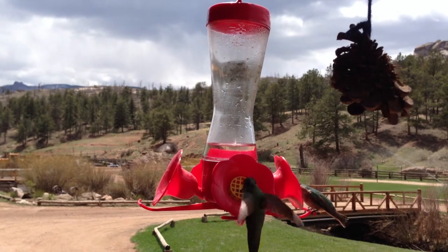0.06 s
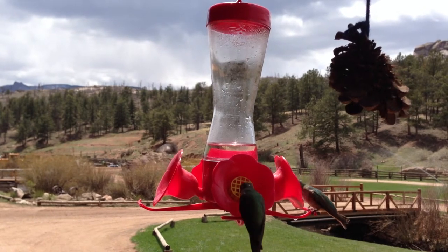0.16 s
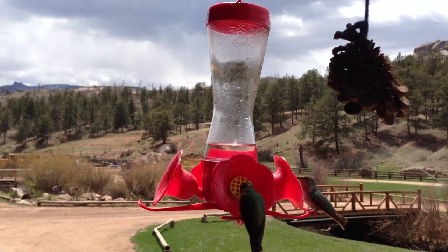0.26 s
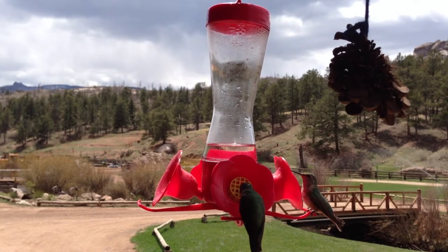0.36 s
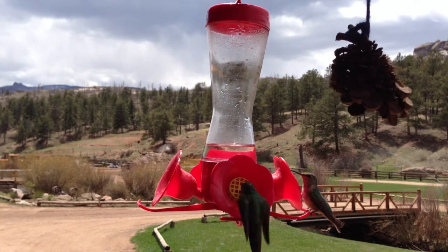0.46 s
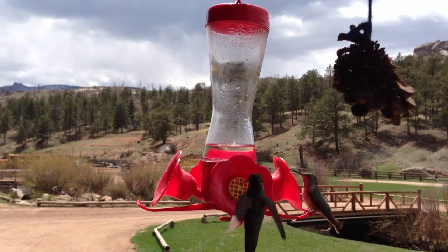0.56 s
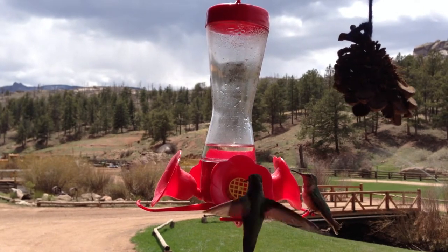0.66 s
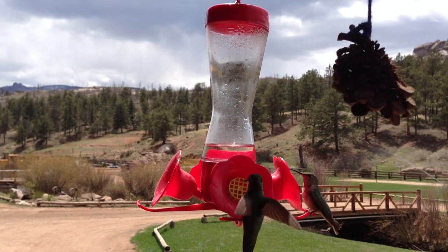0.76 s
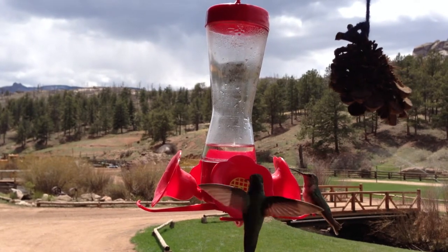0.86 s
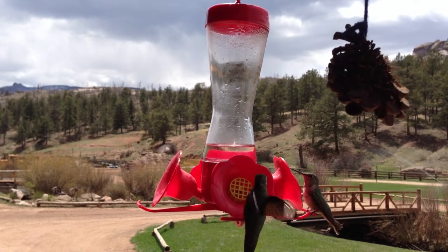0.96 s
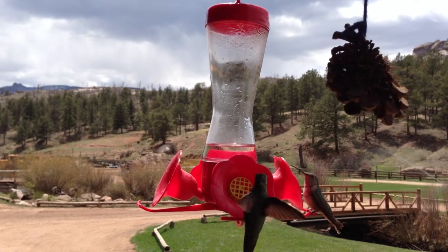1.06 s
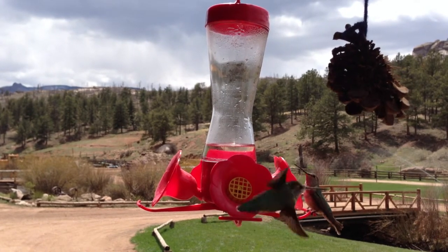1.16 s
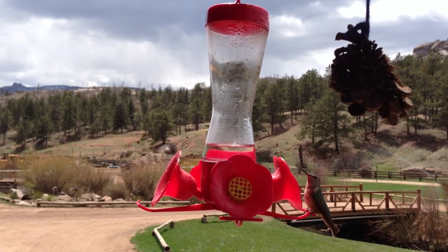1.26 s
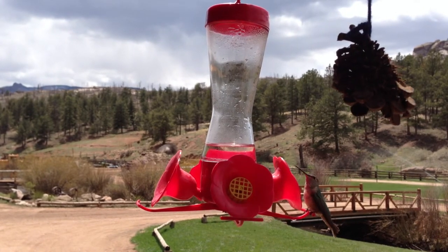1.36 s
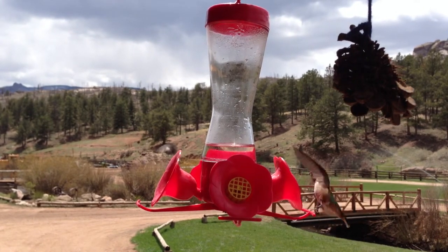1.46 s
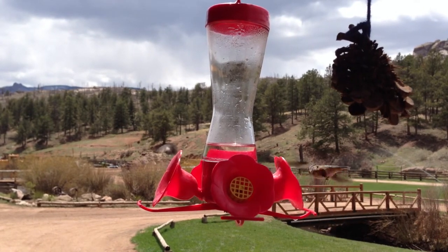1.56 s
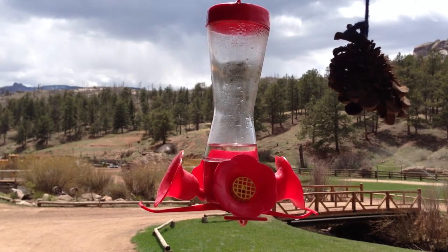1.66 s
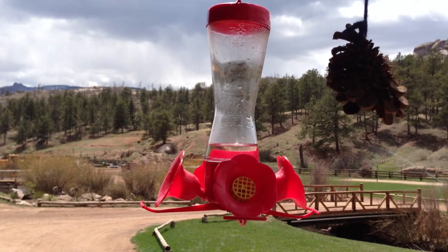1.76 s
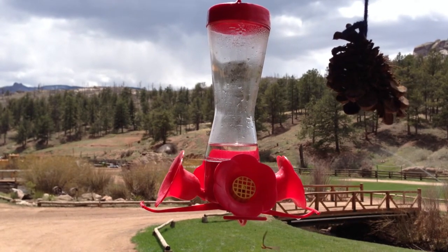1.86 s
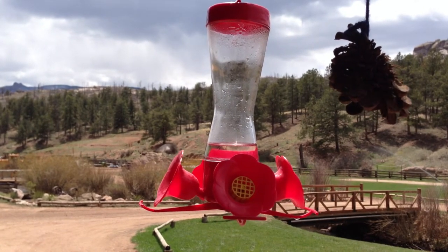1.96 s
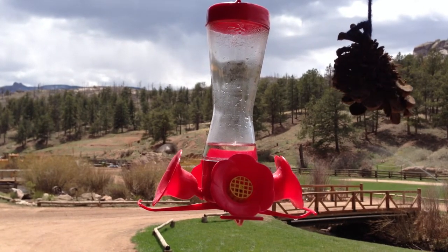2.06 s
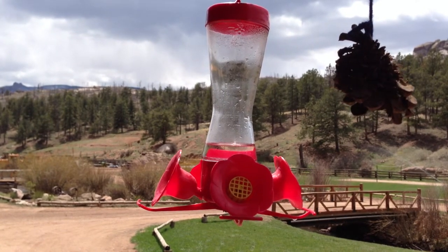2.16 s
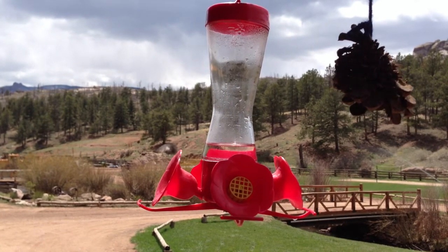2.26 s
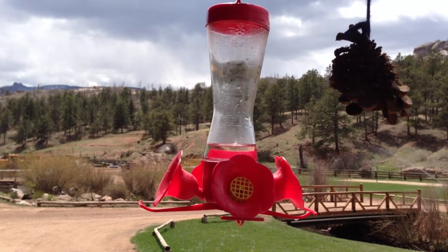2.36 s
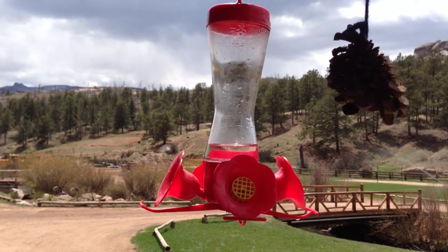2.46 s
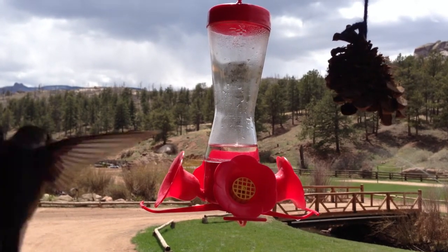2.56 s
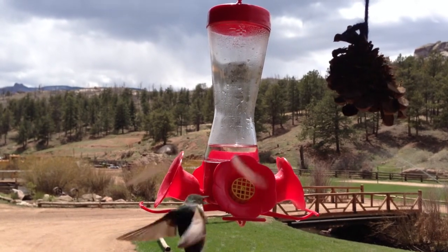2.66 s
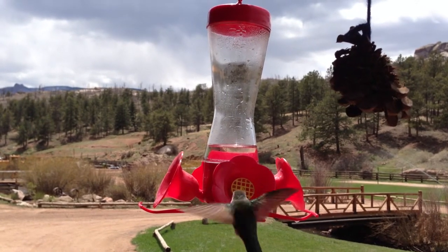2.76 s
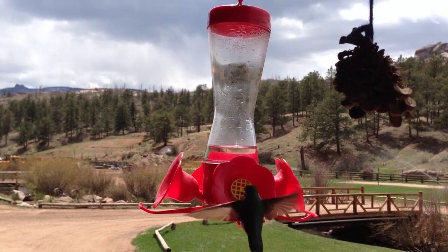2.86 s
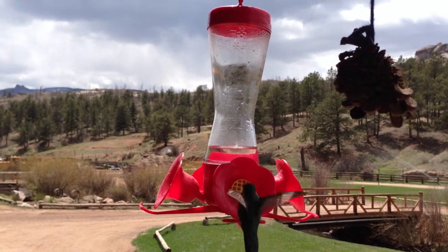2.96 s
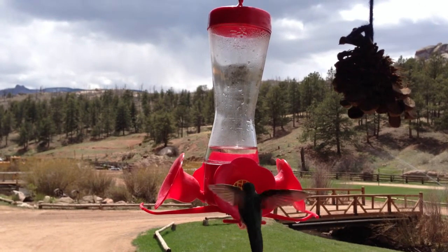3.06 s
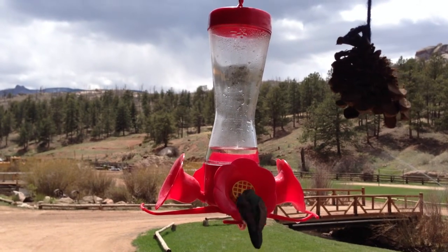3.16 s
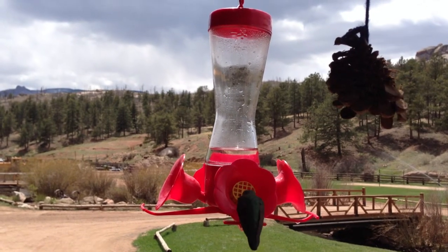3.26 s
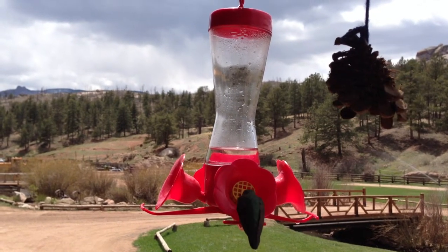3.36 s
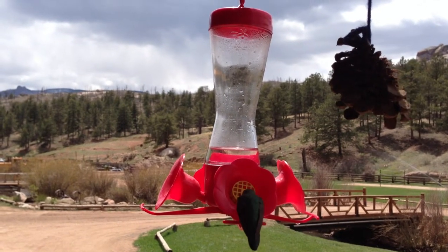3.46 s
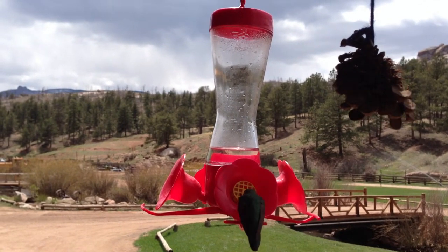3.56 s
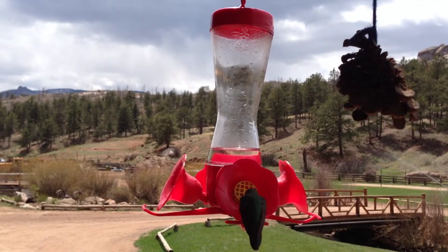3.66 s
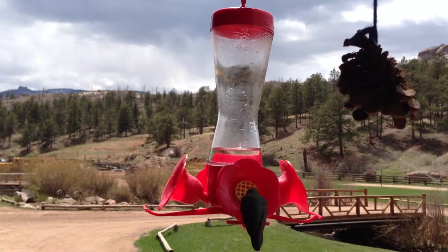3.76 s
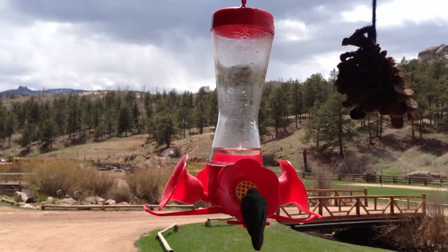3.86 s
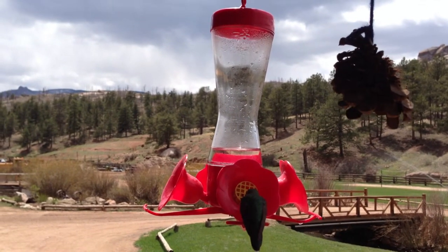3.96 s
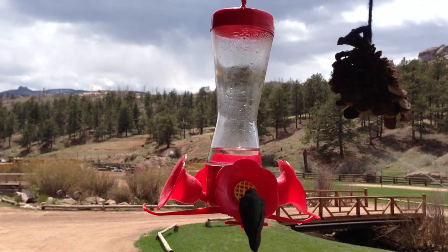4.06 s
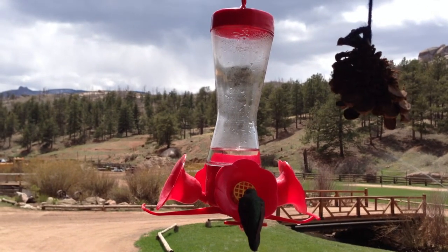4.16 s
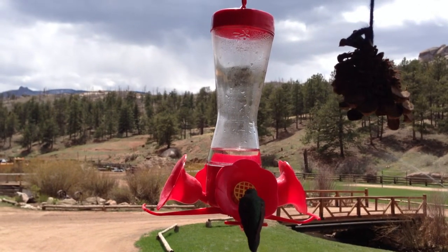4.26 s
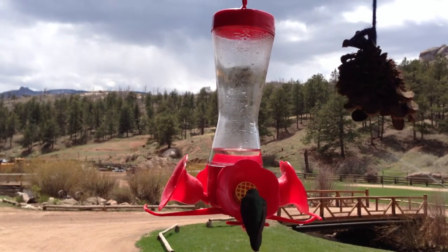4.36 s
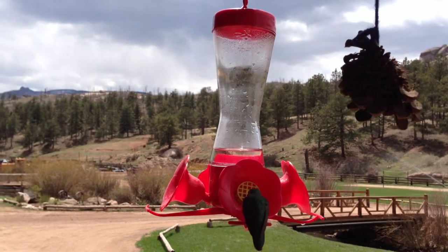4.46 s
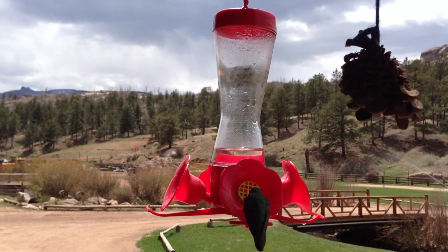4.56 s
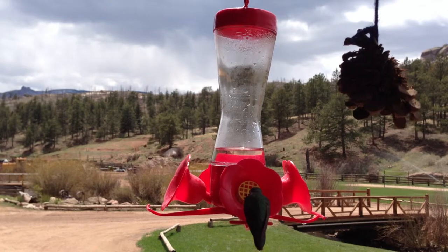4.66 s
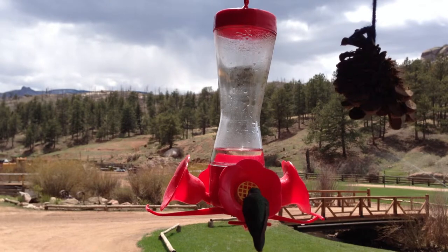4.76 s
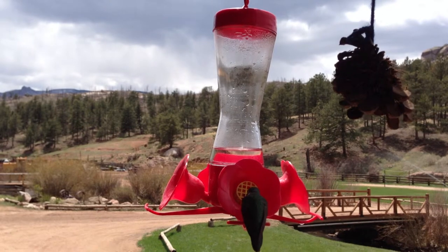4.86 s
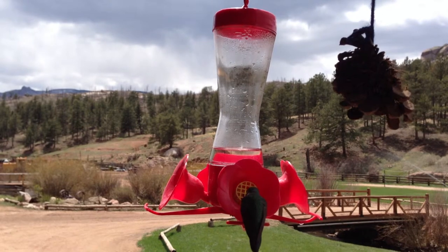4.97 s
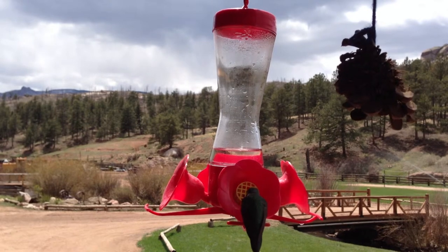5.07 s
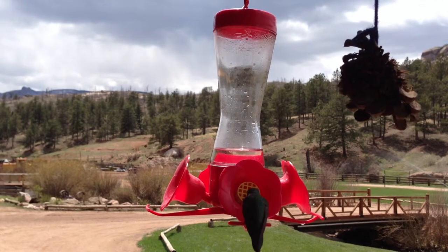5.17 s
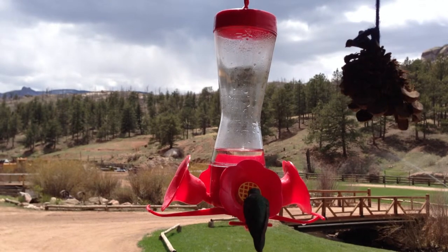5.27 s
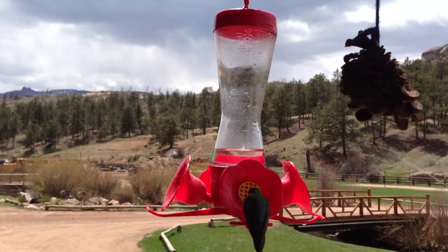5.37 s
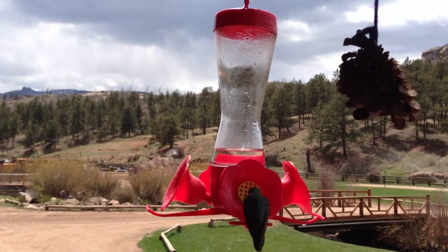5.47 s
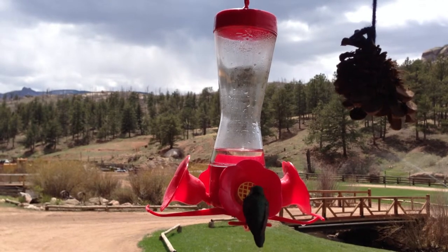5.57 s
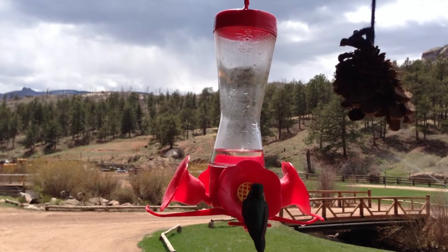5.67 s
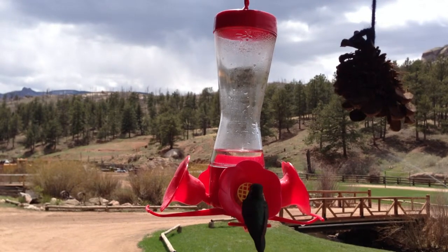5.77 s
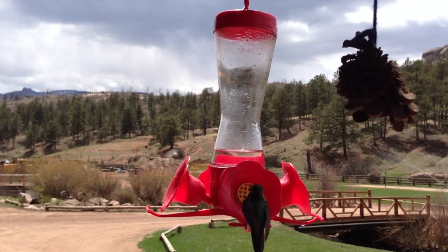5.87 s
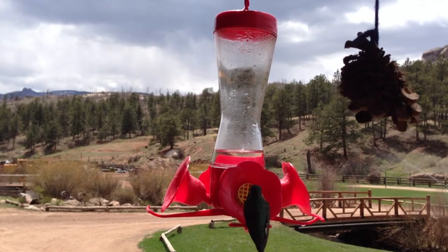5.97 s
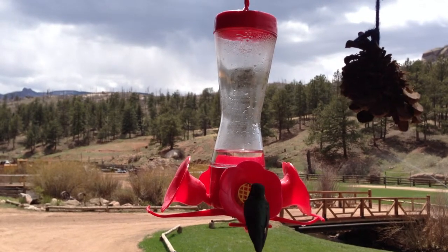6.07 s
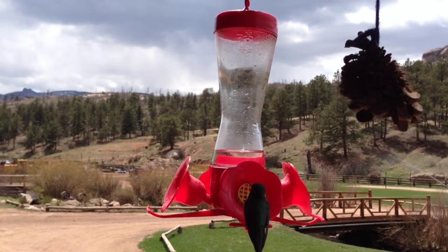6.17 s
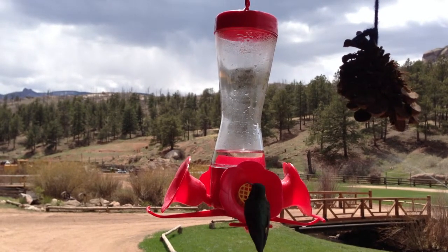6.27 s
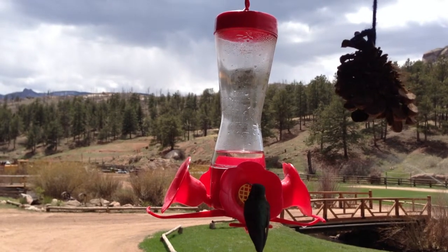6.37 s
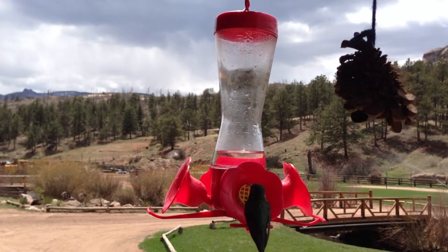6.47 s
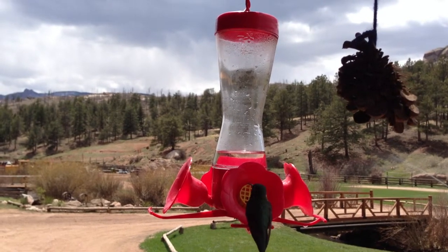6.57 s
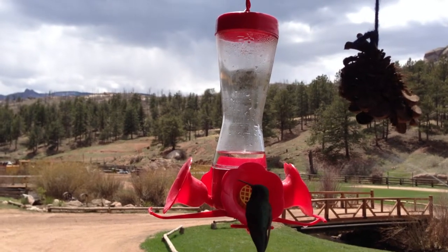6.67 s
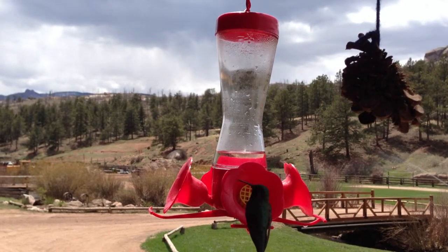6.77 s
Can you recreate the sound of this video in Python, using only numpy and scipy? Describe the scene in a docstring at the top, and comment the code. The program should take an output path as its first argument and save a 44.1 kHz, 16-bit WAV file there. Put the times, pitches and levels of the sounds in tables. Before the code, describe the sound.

Close hummingbird wings whistle and hum in short bursts, chips sound at a feeder, then faint distant trills continue over soft repeating hiss.

```python
"""A light breeze and an evenly repeating hiss, probably a lawn sprinkler, with far-off males trilling.
Hummingbirds are at a feeder in open country: short calls, then one takes off with a falling chip.
A male darts about close by, each wingbeat pushing a soft thud of air, shaped from pulses, and blowing a
short metallic whistle, a sagging tone, through his wing tips. Breeze, spray and feathers are coloured noise."""
import sys
import numpy as np
from scipy import signal
from scipy.fft import rfft, irfft, next_fast_len
from scipy.io import wavfile
from scipy.ndimage import uniform_filter1d, map_coordinates

SR = 44100
rng = np.random.default_rng(int(sys.argv[2]) if len(sys.argv) > 2 else 0)


def output_pcm(signal):
    """Save a mono or channel-first signal as 16-bit PCM at the path in sys.argv[1].

    Samples are clipped to [-1, 1] before scaling.
    """
    pcm = np.clip(np.atleast_2d(signal).T, -1, 1) * 32767
    wavfile.write(sys.argv[1], SR, np.round(pcm).astype(np.int16))


N = 300299  # length in samples


def amp(db):
    """Decibels to gain."""
    return 10 ** (np.asarray(db) / 20)


def unit(x):
    """Scale to rms 1."""
    return x / np.sqrt(np.mean(x ** 2) + 1e-20)


def curve(rows, axis=1):
    """One column of a table, drawn as a line through time, per sample."""
    rows = np.asarray(rows)
    return np.interp(np.arange(N) / SR, rows[:, 0], rows[:, axis])


def loudness(rows, axis=1):
    """Gain per sample from a dB curve, silent outside its span, with the edges smoothed over 10 ms."""
    t = np.arange(N) / SR
    inside = 1.0 * ((t >= rows[0][0]) & (t <= rows[-1][0]))
    return amp(curve(rows, axis)) * uniform_filter1d(inside, SR // 100)


def swell(start, end, rise, fade):
    """Gain per sample: full from start to end, rising before and fading after at so many dB a second."""
    t = np.arange(N) / SR
    return amp(-rise * np.maximum(start - t, 0) - fade * np.maximum(t - end, 0))


def wobble(rate):
    """A smooth random curve, rate knots a second."""
    knots = rng.standard_normal(int(N * rate / SR) + 4)
    return map_coordinates(knots, [np.arange(N) * rate / SR])


def colour(x, points):
    """Causal (minimum-phase) filter with the given (frequency [Hz], gain [dB]) spectrum."""
    size = 2 * next_fast_len(N // 2 + SR // 4)
    hz, db = np.transpose(points)
    log_hz = np.log(np.fft.rfftfreq(size, 1 / SR) + 1)
    cepstrum = irfft(np.log(amp(np.interp(log_hz, np.log(hz), db))))
    # Folding the cepstrum forward in time makes the filter causal.
    cepstrum[1:size // 2] *= 2
    cepstrum[size // 2 + 1:] = 0
    return irfft(rfft(x, size) * np.exp(rfft(cepstrum)))[:N]


def noise(points):
    """Coloured noise of rms 1."""
    return unit(colour(rng.standard_normal(N), points))


def add(track, s, sound):
    """Mix a sound into a track from time s on."""
    start = int(np.clip(round(s * SR), 0, N))
    track[start:start + len(sound)] += sound[:N - start]


def steady(x):
    """Hold a pulse train near rms 1 over a few wingbeats."""
    power = uniform_filter1d(uniform_filter1d(x ** 2, SR // 14), SR // 20)
    return x / np.sqrt(np.abs(power) + np.mean(x ** 2) / 1000)


def echoes(x, t60):
    """Diffuse scatter from wall, eaves and trees: overlapping pieces, each with a fresh decaying noise tail."""
    track, t = np.zeros(N), np.arange(SR // 4) / SR
    size = SR // 6
    fade = signal.windows.cosine(size)
    for start in range(0, N - size // 2, size // 2):
        tail = rng.standard_normal(len(t)) * amp(-60 * t / t60) * (t > 0.003)
        piece = x[start:start + size] * fade[:N - start]
        add(track, start / SR, signal.fftconvolve(piece, tail / np.linalg.norm(tail)))
    return track


def patchy(x, depth_db):
    """Let patches about 170 Hz wide swell and fade on their own."""
    z = signal.stft(x, nperseg=1024)[2]
    field = uniform_filter1d(rng.standard_normal(z.shape), size=4, axis=0)
    field = uniform_filter1d(field, size=7, axis=1)
    return unit(signal.istft(z * amp(depth_db * unit(field)), nperseg=1024)[1][:N])


# colour of the low rush of air: (frequency [Hz], relative level [dB per Hz])
RUSH_SPECTRUM = [(15, -47), (25, -32), (64, -17), (101, -9.5), (196, -8), (243, -1.5), (372, -6),
                 (498, -5.5), (539, -6), (707, -8.5), (1320, -10.5), (1630, -10), (2600, -18.5),
                 (3380, -46), (5720, -120)]
# colour of the smooth hiss above it: (frequency [Hz], relative level [dB per Hz])
HISS_SPECTRUM = [(1200, -29), (2400, -3), (3500, 0), (5000, -2), (8000, -5.5), (12000, -6.5), (15500, -7.5)]
# level of the low rush of air, with the braking male's feather rush near 2.77 s, before a fixed lift:
# (time [s], level [dB])
RUSH_LEVEL = [(0.0, -67.5), (0.59, -64.5), (0.78, -67), (1.59, -65.5), (2.54, -67.5), (2.77, -65),
              (3.18, -66.5), (6.81, -67.5)]


def breeze():
    """Moving air: a gently restless low rush, with the male's feather rush in its level, under a smooth hiss."""
    rush = amp(0.3 * wobble(7)) * patchy(noise(RUSH_SPECTRUM), depth_db=1.6)
    rush_gain = amp(curve(RUSH_LEVEL) + 2.5)
    hiss_gain = amp(-66.5 + 0.26 * wobble(2.37))
    return rush_gain * rush + hiss_gain * noise(HISS_SPECTRUM)


# colour of the water jet: (frequency [Hz], relative level [dB per Hz])
SPRAY_SPECTRUM = [(1500, -33), (2600, -1.5), (3200, 6), (4500, 5), (5800, 4), (7000, -2), (9000, -9),
                  (14000, -20)]
SPURT_DB, SPURT_SWING_DB = -65, 2.5  # mean strength, and its swing as the head turns
SPRINKLER_FACING_S, SPRINKLER_TURN_S = 2.9, 7.5  # when the jet points this way, and one whole turn


def sprinkler(rise=0.014, hold=0.026, fall=0.031):
    """The swinging arm breaks the jet into short, even hisses, loudest when the head faces this way."""
    gate, t = np.zeros(N), np.arange(SR // 5) / SR
    spurt = np.interp(t, np.cumsum([0, rise, hold, fall]), [0, 1, 1, 0])
    for s in np.arange(0.132, N / SR, 0.427):  # first spurt and interval [s]
        add(gate, s, spurt)
    facing = np.cos(2 * np.pi * (np.arange(N) / SR - SPRINKLER_FACING_S) / SPRINKLER_TURN_S)
    return amp(SPURT_DB + SPURT_SWING_DB * facing) * gate * noise(SPRAY_SPECTRUM)


# band in which the wing-tip feathers can sing, and its octave: (frequency [Hz], gain [dB])
VANE_RESONANCE = [(4400, -57), (5200, -17.5), (5750, 1), (6700, 0.5), (7400, -11), (9500, -18.5),
                  (12000, -1.5)]


def whistles(rows, rasp, lead, sag_hz, breathiness=0, lead_hz=1000, waver_hz=90):
    """Each downstroke makes the wing-tip feathers sing briefly: a raspy lead-in, then a sagging, airy tone."""
    track, t = np.zeros(N), np.arange(-SR // 100, SR // 100) / SR
    for s, db, hz, length, overtone_db in rows:
        air = rng.standard_normal((3, len(t)))
        drift, grit = signal.lfilter(np.hanning(SR // 1100), 1, air[:2])
        u = t / length
        pitch = hz - sag_hz * np.tanh(u) + waver_hz * unit(drift)
        phase = 2 * np.pi * np.cumsum(pitch) / SR
        envelope = np.exp(-np.abs(u * np.where(u < 0, 1.15, 1.45)) ** 1.9)  # stops faster than it starts
        tone = np.sin(phase) + amp(overtone_db) * np.sin(2 * phase)
        tone = (1 + rasp * unit(grit)) * tone
        lead_shape = np.exp(-(t / 0.002 + 1.14) ** 2)
        lead_in = lead * lead_shape * unit(grit) * np.sin(phase + 2 * np.pi * lead_hz * t)
        add(track, s + t[0], amp(db) * (envelope * (tone + breathiness * air[2]) + lead_in))
    return colour(track, VANE_RESONANCE)


def trill(beats, pitches, length, sag_hz, spread_hz, scatter_db, wet_db, t60):
    """A whistle without overtone on every wingbeat, blurred by the surroundings and held near rms 1."""
    scatter = rng.standard_normal((len(beats), 2))
    notes = [(beat, scatter_db * a, hz + spread_hz * b, length, -np.inf)
             for beat, hz, (a, b) in zip(beats, pitches, scatter)]
    direct = whistles(notes, rasp=0.033, lead=0.011, sag_hz=sag_hz)
    return steady(direct + amp(wet_db) * echoes(direct, t60))


# flights of distant males: (start [s], end [s], level [dB], pitch [Hz], wingbeat rate [per s])
FAR_FLIGHTS = [(0, 0.5, -75.5, 5960, 45), (2.98, 3.38, -72, 6140, 55), (3.72, 4.85, -73, 6170, 41),
               (4.999, 5.29, -67.5, 6050, 38), (5.4, 5.56, -76.5, 6200, 49), (5.721, 5.89, -60, 6150, 39.7),
               (5.97, 6.58, -65.5, 6155, 51)]
FAR_RISE_DB_PER_S, FAR_FADE_DB_PER_S = 350, 63  # a flight starts quickly and fades into the distance


def far_males():
    """Only the thin trill carries from far away; each flight keeps its own pitch and wingbeat rate."""
    gains = [amp(db) * swell(start, end, FAR_RISE_DB_PER_S, FAR_FADE_DB_PER_S)
             for start, end, db, _, _ in FAR_FLIGHTS]
    gain = np.max(gains, axis=0)
    held = [(s, hz, rate) for start, end, _, hz, rate in FAR_FLIGHTS for s in (start, end)]
    # A wingbeat falls wherever the running count of beats passes a whole number.
    beats = np.flatnonzero(np.diff(np.floor(np.cumsum(curve(held, axis=2)) / SR)))
    return gain * trill(beats / SR, curve(held)[beats], length=0.0032, sag_hz=150, spread_hz=47,
                        scatter_db=3.5, wet_db=-3, t60=0.2)


# calls: (time [s], level of the fundamental [dB], start pitch [Hz], pitch it falls towards [Hz], length [s])
CHIPS = [(0.549, -59, 3300, 3080, 0.011), (0.577, -55, 3320, 3020, 0.019),
         (1.372, -35.5, 5920, 3230, 0.018)]


def chips():
    """A call plunges in pitch and levels out, with two weak overtones."""
    track = np.zeros(N)
    for s, db, start_hz, end_hz, length in CHIPS:
        u = np.linspace(0, 1, int(length * SR))
        pitch = end_hz + (start_hz - end_hz) * np.exp(-u / 0.31)
        phase = 2 * np.pi * np.cumsum(pitch) / SR
        shape = np.interp(u, [0, 0.06, 0.2, 0.45, 0.88, 1], [0, 1, 0.95, 0.5, 0.2, 0])
        voice = np.sin(phase) + amp(-17.0) * np.sin(2 * phase) + amp(-22) * np.sin(3 * phase)
        add(track, s, amp(db) * shape * voice)
    return track + amp(-14.0) * echoes(track, 0.27)


# a claw or bill taps the feeder: (time [s], level at onset [dB])
TAPS = [(1.421, -40)]
# colour of the struck plastic: (frequency [Hz], relative level [dB per Hz])
PLASTIC_SPECTRUM = [(150, -17), (600, 9), (1500, 9), (3000, 4.5), (5000, 3.5), (9000, -4), (15000, -8)]


def taps(t60=0.0095):
    """A dry tick on the plastic: a very fast decay of coloured noise."""
    track, t = np.zeros(N), np.arange(SR // 50) / SR
    for s, db in TAPS:
        add(track, s, amp(db - 60 * t / t60))
    return track * noise(PLASTIC_SPECTRUM)


# the deep push of one wing stroke: (frequency [Hz], relative level [dB per Hz])
THUD_SPECTRUM = [(25, -31), (60, -18), (85, -21), (125, -6), (165, 3), (210, 1), (260, -23.5), (400, -21),
                 (1500, -66)]
# the sharper snap as the wing turns over: (frequency [Hz], relative level [dB per Hz])
SNAP_SPECTRUM = [(60, -58), (170, -30.5), (245, 3), (330, 0), (420, -8), (520, -20), (700, -23),
                 (1300, -47), (3000, -89)]
# air rushing through the feathers: (frequency [Hz], relative level [dB per Hz])
FEATHER_SPECTRUM = [(200, -52), (600, -1.5), (1800, -4.5), (2800, -8), (4500, -5.5), (7500, -1), (9500, -9),
                    (15000, -14)]


def wing_hum(beats, rows, upstroke, turn, rush_db, wet_db):
    """Down- and upstroke each push a pulse of air, deep or snappy as the wings face; the feathers rush with it."""
    pushes = np.zeros(N)
    jitter, scatter_db = 0.0006, 2.8  # stroke timing [s] and strength [dB]
    scatter = rng.standard_normal((len(beats), 4))
    for s, period, (down, up, early, late) in zip(beats, np.diff(beats), scatter):
        add(pushes, s + jitter * early, amp([scatter_db * down]))
        add(pushes, s + turn * period + 2 * jitter * late, upstroke * amp([scatter_db * up]))
    pushes = pushes + amp(wet_db) * echoes(pushes, 0.12)
    thud = loudness(rows) * steady(colour(pushes, THUD_SPECTRUM))
    snap = loudness(rows, axis=2) * steady(colour(pushes, SNAP_SPECTRUM))
    hum = thud + snap
    sweep = np.sqrt(np.abs(uniform_filter1d(hum ** 2, SR // 140)))  # strength of each stroke
    return hum + amp(rush_db) * sweep * noise(FEATHER_SPECTRUM)


# wing hum of the departing bird, before its bass cut: (time [s], thud level [dB], snap level [dB])
TAKEOFF_HUM = [(1.18, -81, -78), (1.318, -52.5, -55.5), (1.378, -49, -75), (1.4, -51, -64),
               (1.458, -70, -72), (1.48, -67, -67)]


def takeoff():
    """A bird leaves its perch with fast, shallow strokes that carry little bass."""
    beats = np.arange(TAKEOFF_HUM[0][0], TAKEOFF_HUM[-1][0], 1 / 54)  # 54 wingbeats per second
    hum = wing_hum(beats, TAKEOFF_HUM, upstroke=0.67, turn=0.365, rush_db=-10.0, wet_db=-6)
    return colour(hum, [(60, -17), (110, -1.5), (160, -2.0)])


BEAT_HZ = 40  # the male's usual wingbeats per second


def strokes(start, end):
    """Evenly spaced downstrokes from start to end, close to the male's usual rate."""
    return np.linspace(start, end, max(1, round((end - start) * BEAT_HZ)) + 1)


# swerves, in which every downstroke whistles clearly; levels are before the feather resonance:
# (start [s], end [s], first level [dB], last level [dB], first pitch [Hz], last pitch [Hz],
#  whistle time scale [s], overtone level [dB])
SWERVES = [(0.708, 1.049, -40.5, -42, 6346, 6100, 0.0034, -31),
           (1.279, 1.3627, -45, -41, 6370, 6290, 0.0035, -22),
           (1.5698, 1.7675, -30.5, -37.5, 6270, 6330, 0.0025, -28),
           (2.4235, 2.497, -27.5, -37.5, 6310, 6330, .0028, -20),
           (2.6164, 2.742, -38, -35, 6030, 6180, 0.002, -26),
           (2.767, 2.882, -51, -33.5, 6180, 6250, 0.0015, -28)]
# sharp strokes, with the wing tip square to the microphone; levels are before the feather resonance:
# (time [s], level [dB], pitch [Hz], whistle time scale [s])
SHARP_STROKES = [(1.026, -34, 6130, .002), (1.6672, -22.5, 6240, 0.003), (1.718, -30, 6230, .0029),
                 (1.7691, -21, 6340, 0.0022), (1.871, -38, 6297, 0.0007), (2.6182, -22.5, 5970, 0.0032),
                 (2.643, -12, 6010, 0.0011), (2.692, -21, 6110, 0.002), (2.766, -22.5, 5990, 0.0033),
                 (2.789, -22.5, 6010, 0.0032), (2.8364, -26, 6090, 0.0017)]
SHARP_OVERTONE_DB = -30.5
STROKE_SCATTER_DB, STROKE_SCATTER_HZ = 0.9, 43.7  # from one wingbeat to the next


def clear_strokes():
    """Level and pitch slide evenly through a swerve; a sharp stroke takes the place of the ordinary one."""
    notes = [(*row, SHARP_OVERTONE_DB) for row in SHARP_STROKES]
    sharp_s = np.asarray(SHARP_STROKES)[:, 0]
    for start, end, first_db, last_db, first_hz, last_hz, length, overtone_db in SWERVES:
        beats = strokes(start, end)
        a, b = rng.standard_normal((len(beats), 2)).T
        levels = np.linspace(first_db, last_db, len(beats)) + STROKE_SCATTER_DB * a
        pitches = np.linspace(first_hz, last_hz, len(beats)) + STROKE_SCATTER_HZ * b
        notes += [(s, db, hz, length, overtone_db) for s, db, hz in zip(beats, levels, pitches)
                  if np.abs(sharp_s - s).min() > 0.5 / BEAT_HZ]
    return notes


# hard strokes, with which he turns or stops: (time [s], lift over the hum [dB])
HARD_STROKES = [(1.519, 5), (1.769, 7.5), (2.692, 2)]


def effort():
    """Gain on the hum: each hard stroke lifts it for one wingbeat."""
    boost_db = np.zeros(N)
    for s, db in HARD_STROKES:
        add(boost_db, s, db * signal.windows.tukey(SR // BEAT_HZ))
    return amp(boost_db)


# colour of the downwash on the microphone: (frequency [Hz], relative level [dB per Hz])
BUFFET_SPECTRUM = [(15, -23), (35, -30), (70, -9), (125, -2), (200, -4), (600, -32), (2000, -81)]
BRAKE_START_S, BRAKE_END_S, BRAKE_RISE_DB_PER_S, BRAKE_FADE_DB_PER_S = 2.6, 2.82, 900, 130
BRAKE_RUSH_DB, DOWNWASH_DB = -61.5, -50.5


def braking():
    """He brakes at the feeder: spread feathers rush throughout, and a puff of downwash comes first and dies away."""
    rush_gain = swell(BRAKE_START_S, BRAKE_END_S, BRAKE_RISE_DB_PER_S, BRAKE_FADE_DB_PER_S)
    puff_gain = swell(BRAKE_START_S, BRAKE_START_S, BRAKE_RISE_DB_PER_S, BRAKE_FADE_DB_PER_S)
    rush = rush_gain * noise(FEATHER_SPECTRUM)
    puff = puff_gain * noise(BUFFET_SPECTRUM)
    return amp(BRAKE_RUSH_DB + 3.6 * wobble(120)) * rush + amp(DOWNWASH_DB) * puff


# the male's flight, heard as a soft, scattered trill, before the final trim:
# (time [s], level [dB], pitch [Hz])
FLIGHT = [(0.64, -69, 6280), (0.76, -53, 6130), (0.85, -47, 6100), (0.94, -47, 6250), (1.06, -44.5, 6190),
          (1.12, -58.5, 6080), (1.25, -77, 5950), (1.291, -55, 6170), (1.34, -51, 6220), (1.46, -68, 5900),
          (1.53, -58.5, 6160), (1.9, -59, 6230), (2.06, -51.5, 6340), (2.3, -55, 6050), (2.43, -54.5, 6240),
          (2.85, -59.5, 6120), (2.95, -63.5, 6210), (3.1, -84, 6080)]
# the male's wing hum, before effort and the final trim: (time [s], thud level [dB], snap level [dB])
MALE_HUM = [(1.47, -74, -77), (1.51, -57, -61), (1.606, -46.5, -50.5), (1.79, -53, -60.5), (1.8, -62, -65),
            (1.846, -59, -57.5), (1.914, -62, -66), (2.356, -58, -59), (2.49, -56.5, -72),
            (2.558, -70, -74), (2.596, -41.5, -55.5), (2.664, -43.5, -48.5), (2.858, -57, -64.5),
            (3.018, -59.5, -72), (3.096, -80, -84), (3.12, -77, -70)]


def male_beats():
    """His wings beat on without a break through and between the swerves."""
    swerve_edges = np.asarray(SWERVES)[:, :2].ravel()
    marks = np.r_[FLIGHT[0][0], swerve_edges, MALE_HUM[-1][0]]
    return np.concatenate([strokes(a, b)[:-1] for a, b in zip(marks, marks[1:])])


def male():
    """Close by: loud whistles when the wings face this way, a softer trill, the hum and its draught."""
    beats = male_beats()
    s, _, hz = np.transpose(FLIGHT)
    loud = whistles(clear_strokes(), rasp=0.14, lead=0.18, sag_hz=49.3, breathiness=0.034)
    loud = loud + amp(-20) * echoes(loud, 0.18)
    soft = loudness(FLIGHT) * trill(beats, np.interp(beats, s, hz), length=0.002, sag_hz=104.0,
                                    spread_hz=66.4, scatter_db=1.0, wet_db=2, t60=0.34)
    hum = effort() * wing_hum(beats, MALE_HUM, upstroke=0.34, turn=0.453, rush_db=-16, wet_db=-13)
    return loud + amp(0.5) * soft + amp(-1.5) * hum + braking()


def scene():
    """Everything at one microphone, from the background to the male close by."""
    background = breeze() + sprinkler() + far_males()
    feeder = chips() + taps() + takeoff()
    return (background + feeder + male())[None]


TOP_HZ = 15480  # upper band limit


def record(dry):
    """Cut everything from the upper band limit up."""
    size = next_fast_len(N + SR // 2)
    in_band = np.fft.rfftfreq(size, 1 / SR) < TOP_HZ
    return irfft(rfft(dry, size) * in_band, size)[..., :N]


dry = scene()
out = record(dry)
output_pcm(out)
```